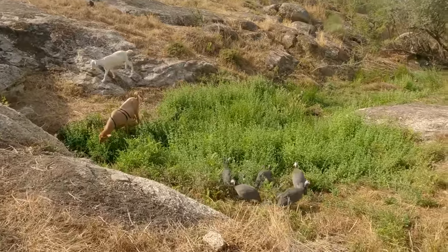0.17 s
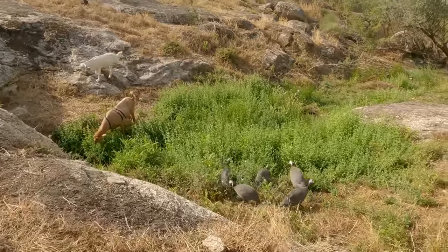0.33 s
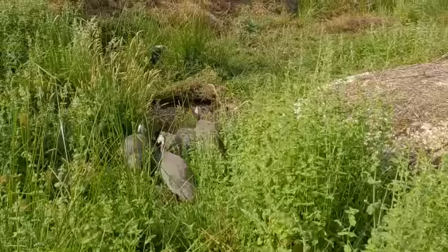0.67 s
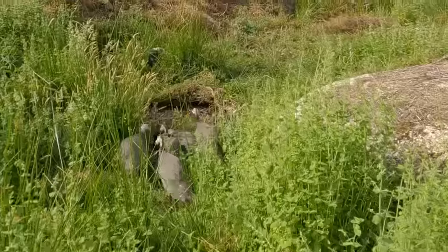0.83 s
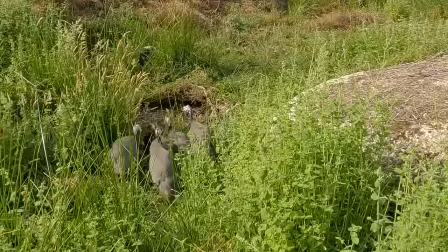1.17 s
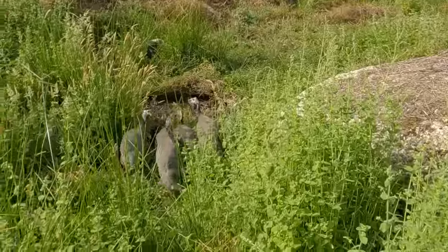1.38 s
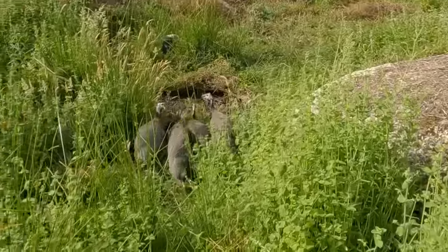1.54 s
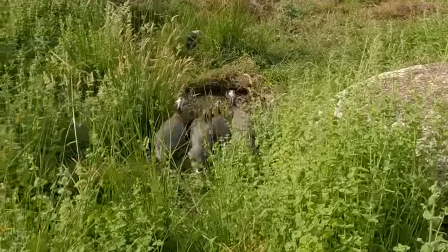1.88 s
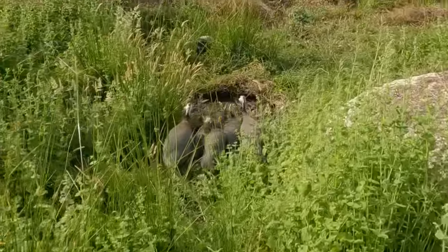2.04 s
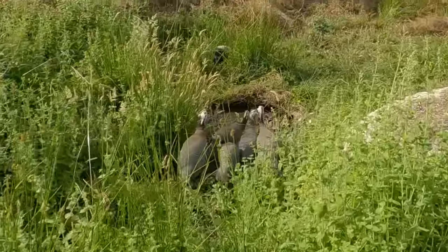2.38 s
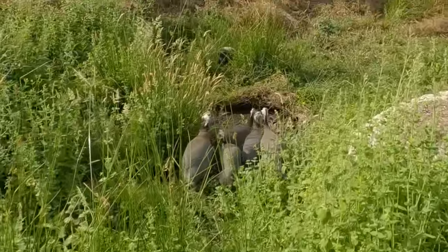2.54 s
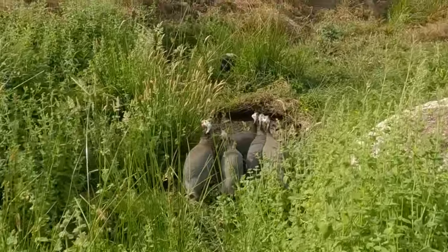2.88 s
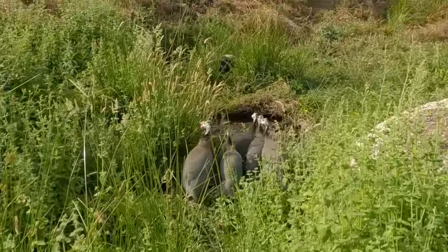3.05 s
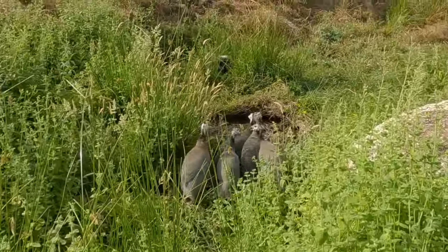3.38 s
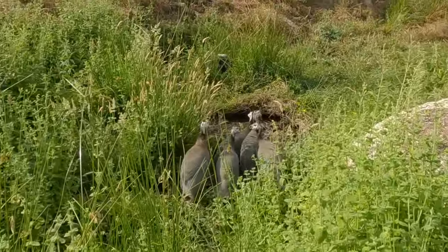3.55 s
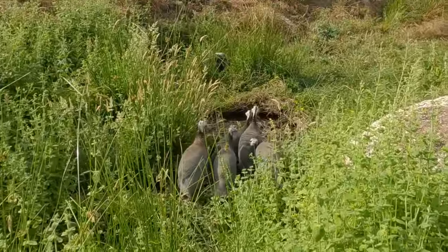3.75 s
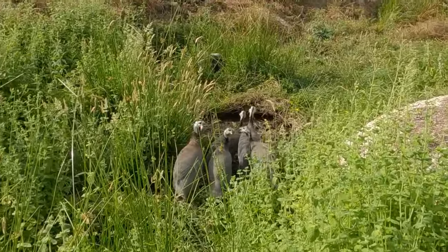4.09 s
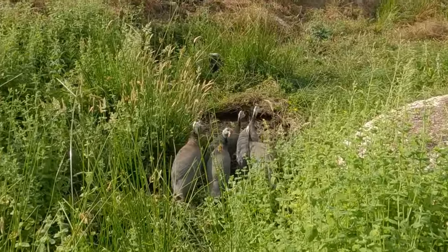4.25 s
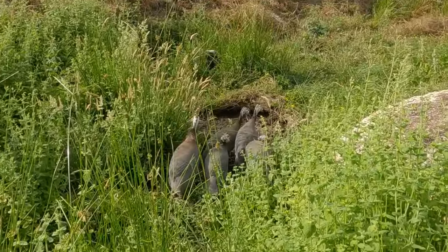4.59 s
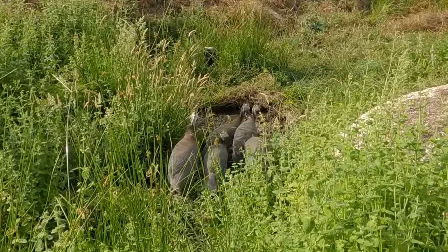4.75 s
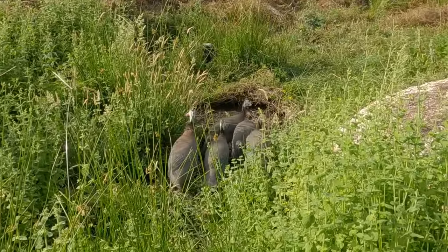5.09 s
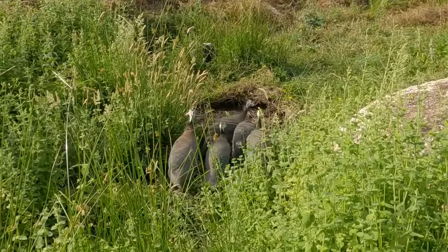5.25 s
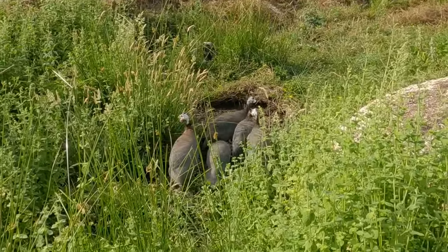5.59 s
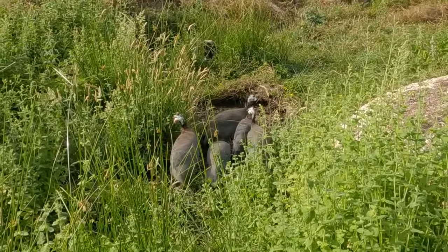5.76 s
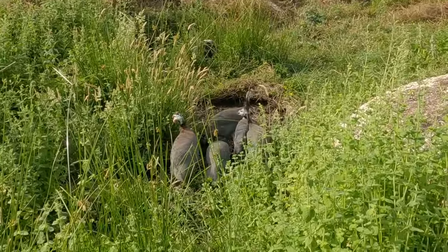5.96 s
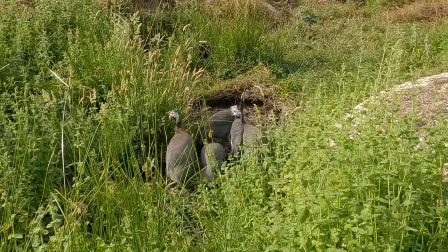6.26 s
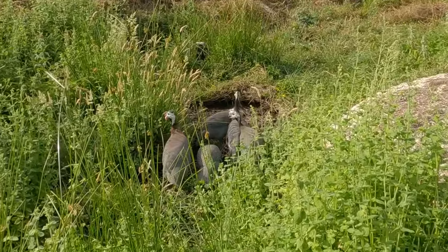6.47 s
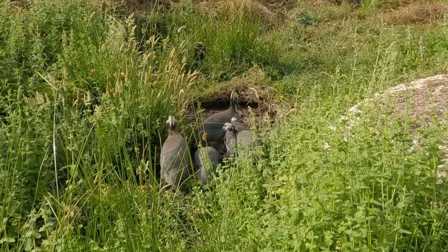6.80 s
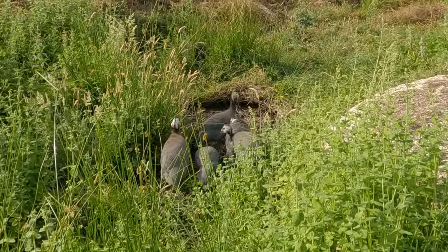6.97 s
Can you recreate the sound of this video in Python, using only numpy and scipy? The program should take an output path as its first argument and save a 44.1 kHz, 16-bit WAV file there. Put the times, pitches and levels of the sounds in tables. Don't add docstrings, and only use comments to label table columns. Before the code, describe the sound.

A loud peep opens over dry straw that hisses, ticks and snaps for about half a second. The scene then shifts to greener weeds, where several guinea fowl peep, cluck and rasp a few metres away. Leaf rustle gradually dies down, stems crack, and two long whistles hold, leap up and fall between short harsh cackles. Close, dry outdoor sound with thin bass and faint rock echoes.

```python
import sys
import numpy as np
from scipy import signal
from scipy.fft import rfft, irfft
from scipy.io import wavfile
from scipy.ndimage import uniform_filter1d

SR = 44100
rng = np.random.default_rng(int(sys.argv[2]) if len(sys.argv) > 2 else 0)


def linear_from_db(decibels):
    return 10 ** (np.asarray(decibels, float) / 20)


def unload_audio(sound):
    columns = np.transpose(np.atleast_2d(sound))
    steps = np.round(np.clip(columns, -1, 1) * 32767)
    wavfile.write(sys.argv[1], SR, steps.astype(np.int16))


N = 314433


def evened(x):
    return x / np.sqrt(np.mean(x ** 2) + 1e-20)


def read(points, hz):
    f, value = np.transpose(points)
    return np.interp(np.log(hz + 1), np.log(f + 1), value)


def add(mix, s, sound):
    start = round(s * SR)
    part = mix[max(start, 0):][:len(sound) + min(start, 0)]
    part += sound[max(-start, 0):][:len(part)]


def wander(count, hz):
    noise = rng.standard_normal(count + 800)
    return evened(signal.lfilter(*signal.butter(2, hz, fs=SR), noise)[800:])


def band(x, lo_hz, hi_hz):
    return signal.sosfilt(signal.butter(2, [lo_hz, hi_hz], "band", fs=SR, output="sos"), x)


# (t/s, rustle level/dB, gust level/dB)
STIRRING = [(0, 28.5, 10.5), (.142, 20.5, -4), (.43, 18.5, 2), (.535, 33, 8), (0.613, 28, 8), (.624, 20, 5),
            (.95, 14.5, 3), (1.601, 20.5, 7.5), (1.89, 11, -3), (3.18, 0.5, 0.5), (3.31, 12.5, 5),
            (3.45, -2, 1), (3.62, -2, 1), (4.0, -1, -2.5), (4.85, -5, -2.5), (5.99, 0.5, 3),
            (6.84, -4.5, -3), (7.13, -2, -5)]
STIRRING_HZ = [350, 1800, 5200, 11500]
# (f/Hz, level/dB per Hz)
LEAF_COLOUR = [(53, -76), (90, -42.5), (142, -9), (276, -9.5), (587, -5), (885, -8.5), (1070, -8.5),
               (1420, -5.5), (1840, -2), (3090, -12), (4090, -20.5), (7160, -33), (8880, -42), (10300, -42),
               (15600, -53)]
# (f/Hz, level/dB)
EARLY_COLOUR = [(5000, 0), (7500, -2.5), (8800, -2.5), (9700, 3), (10600, 0), (15000, 2.5)]
MID_SHARE, MID_DB, TOP_SHARE, TOP_DB = 0.42, -6.5, 0.68, -2
STRAW_S, STRAW_DB = .618, 10
BREATH_DB, BREATH_S = 37.5, 0.025


def leaves():
    hz, t, hiss = signal.stft(rng.standard_normal(N + 512), SR, nperseg=512, noverlap=384)
    size = linear_from_db(4.0 * np.minimum(rng.exponential(1, N + 512), 3))
    size = size * (rng.random(N + 512) < 900 / SR)
    pops = evened(size * rng.choice([-1, 1], N + 512))
    crackle = signal.stft(pops, SR, nperseg=512, noverlap=384)[2]
    s, rustle, gust = np.transpose(STIRRING)
    rustle, gust = np.interp(t, s, rustle), np.interp(t, s, gust)
    straw = t < STRAW_S
    breath = 0
    for rows in CACKLES[1:]:
        at, _, db = max(rows, key=lambda row: row[2])
        breath = breath + (db + BREATH_DB) * np.exp(-((t - at) / BREATH_S) ** 2)
    middle = MID_DB + MID_SHARE * rustle + breath
    top = TOP_DB + TOP_SHARE * rustle + STRAW_DB * straw
    change = np.array([gust, middle, rustle + .5 * breath, top])
    change = np.array([np.interp(np.log(hz + 1), np.log(STIRRING_HZ), column) for column in change.T]).T
    share = np.clip(0.52 + 0.0092 * change, 0, .9) * np.interp(hz, [500, 4000], [0, 1])[:, None]
    patches = uniform_filter1d(rng.standard_normal(hiss.shape), 8, 0)
    patches = evened(uniform_filter1d(patches, 16, 1))
    flicker = evened(uniform_filter1d(rng.standard_normal(len(t)), size=6))
    field_db = read(LEAF_COLOUR, hz)[:, None] + change + np.outer(read(EARLY_COLOUR, hz), straw)
    field_db = field_db + 1.5 * patches + 1.2 * flicker
    hiss = (np.sqrt(1 - share ** 2) * hiss + share * crackle) * linear_from_db(field_db)
    return linear_from_db(-33.5) * signal.istft(hiss, SR, nperseg=512, noverlap=384)[1][:N]


# (t/s, peak level/dB, f/Hz)
KNOCKS = [
    (0.547, -41.5, 350),
    (3.785, -48, 169),
    (4.432, -50.5, 167),
    (5.408, -55, 350),
    (6.128, -47.5, 184),
    (6.163, -52, 340),
]
# (t/s, level/dB, upper edge f/Hz, fade t/s)
BRUSHES = [
    (.69, -40.5, 935, 0.057),
    (0.884, -30.5, 1420, 0.058),
    (1.123, -33.5, 910, 0.03),
    (3.199, -36.5, 930, 0.018),
    (3.249, -75, 7250, 0.044),
    (6.014, -57, 3800, .04),
    (6.162, -55, 3800, .03),
]


def feet():
    out, t = np.zeros(N), np.arange(SR // 5) / SR
    for s, db, hz in KNOCKS:
        swell = t / 0.00089 * np.exp(1 - t / 0.0027)
        add(out, s, linear_from_db(db) * np.sin(2 * np.pi * hz * t) * swell)
    for s, db, hz, fade in BRUSHES:
        brush = evened(band(rng.standard_normal(len(t)), 277, hz))
        add(out, s, linear_from_db(db) * brush * (1 - np.exp(-t / 0.0099)) * np.exp(-t / fade))
    return out


# (t/s, peak level/dB, f/Hz, length/cycles)
TICKS = [(.0014, -15, 2600, 1.0), (.0402, -20, 3000, .8), (.1094, -23, 4000, .9), (.1131, -28, 3400, 1.1),
         (.1193, -23, 2700, 1.2), (.1549, -28, 2900, 1.6), (.1605, -30, 2800, 1.1), (.1708, -32, 3200, 1.1),
         (.2046, -14, 2600, .8), (.2136, -27, 2700, 1.2), (.2214, -33, 4500, 1.1), (.2315, -8.5, 4000, .9),
         (.241, -8, 4000, .45), (.2476, -31, 2400, 1.5), (.2597, -34, 3000, .8), (.2665, -31, 4500, 1.4),
         (.278, -32, 4800, 1.4), (.2825, -31, 3100, 2.2), (.446, -27, 2600, .9), (.53, -18, 2700, .6),
         (.5619, -20, 3000, .7), (.5792, -13.5, 3600, .6), (.6178, -27, 3200, .8), (6.0174, -27, 2200, .8),
         (6.063, -35, 3500, .9), (6.1655, -30, 3500, .8), (6.281, -39, 4700, 1.3)]


def ticks():
    out, t = np.zeros(N), np.arange(300) / SR
    for s, db, hz, cycles in TICKS:
        u = t * hz / max(cycles, .2)
        tick = np.sin(2 * np.pi * hz * t) * u * np.exp(-1.45 * u)
        tick[1] += .1 * abs(tick).max()
        tick = band(tick, 1500, 11500)
        add(out, s, linear_from_db(db) * tick / abs(tick).max())
    return out


# (t/s, peak level/dB, centre f/Hz,
# treble level/dB, scrape t/s)
SNAPS = [(0.045, -27, 2400, -6, 0.002), (0.188, -28, 2800, -6, 0.003), (0.3686, -31, 3100, -6, 0.0005),
         (0.1985, -32, 2800, -3, 0.0005), (0.233, -30, 3000, -7, 0.001), (0.336, -47, 2140, -6.5, 0.00024),
         (0.353, -32, 1810, -19, 0.00047), (0.4815, -27, 2500, -12, 0.00072),
         (0.5305, -22, 2870, -8, 0.002), (0.5795, -20, 2850, -3, 0.0012), (0.855, -31, 3500, 0, .0006),
         (1.154, -28.5, 2200, -12, .0006), (0.6716, -29, 1920, 1.5, 0.00036),
         (1.0955, -28, 2400, -12, 0.0006), (1.125, -27.5, 2300, -21, 0.0022),
         (1.2505, -24.5, 2510, -3, 0.000059), (2.008, -33, 2940, -2, 0.00011),
         (.543, -22.5, 3020, -28, 0.0028), (0.549, -36, 2800, -13, .002),
              (0.57, -27.5, 2610, -7, 0.0025), (2.594, -42.5, 2400, -10, 0.00085),
              (2.624, -35, 2800, -18, 0.002), (2.634, -31, 3400, -14, .002), (2.726, -32, 4100, -16, .003),
              (2.634, -33.5, 1470, -21, 0.0012), (2.661, -35, 3640, -30, 0.0037),
              (2.7245, -30, 1730, -9.5, 0.0044), (2.761, -30.5, 1810, -16, 0.0017),
              (2.7705, -27.5, 2120, -19, 0.0014), (2.9, -41, 2070, -21, 0.001),
              (2.9907, -26.5, 2040, -18, 0.0015), (3.2014, -24.5, 2100, -24, 0.0014),
              (3.6162, -42, 2350, -9, 0.0013), (5.005, -32, 2660, -24, 0.00051),
              (6.018, -38, 2200, -8, 0.003), (6.063, -39, 2000, -6, 0.0015),
              (6.1655, -34, 1900, -3, 0.0012), (6.574, -37, 2020, -34, 0.0025)]


def snaps():
    out, t, rows = np.zeros(N), np.arange(1600) / SR, SNAPS
    for s, db, hz, treble_db, scrape in rows:
        u = t / max(scrape, .0001)
        crack = rng.standard_normal(len(t)) * (u * np.exp(1 - u) + 0.025 * np.exp(-t / 0.01))
        crack[1] += 0.00059 / scrape
        body = band(band(crack, hz / 1.384, hz * 1.295), 350, 3200)
        treble = band(band(crack, 3000, 6600), 3000, 6600)
        treble += .06 * band(crack, 7000, 13000) * .0003 / scrape
        crack = body / abs(body).max() + linear_from_db(treble_db) * treble / abs(treble).max()
        add(out, s, linear_from_db(db) * crack)
    return out


# (f/Hz, level/dB)
THROAT = [(560, -36), (830, -8), (1300, 0), (2400, -1), (3500, -26), (4600, -24), (6200, -42), (9000, -65)]


def cluck(middle, length, pitch_hz, db, bright_db, beak, rough):
    count = int(length * SR)
    hz = pitch_hz * (1 + np.linspace(.05, -.05, count) + .07 * rough * wander(count, 250))
    turn = 2 * np.pi * np.cumsum(hz) / SR
    early = turn + .9 * rough * np.sin(turn / 4)
    folds = sum(np.cos(k * early + 0.16 * k ** 2) for k in range(1, int(9000 / pitch_hz) + 1))
    stumble = 1 + rough * (.6 * np.cos(turn / 4) + .5 * wander(count, 400))
    swell = np.sin(np.pi * np.linspace(0, 1, count) ** 1.3) ** 1.5
    f = np.fft.rfftfreq(count, 1 / SR)
    colour_db = read(THROAT, np.maximum(f / beak, np.minimum(f, 1300)))
    colour_db += bright_db * np.log2(np.maximum(f, .7 * pitch_hz) / 1000 + 0.16)
    colour_db -= 24 * np.log2(np.maximum(f / 4500, 1))
    voice = irfft(rfft(folds * stumble * swell) * linear_from_db(colour_db), count)
    return middle - length / 2, linear_from_db(db) * evened(voice) * signal.windows.tukey(count, .2)


# (middle t/s, length t/s, pitch f/Hz, level/dB, brightness/dB per octave)
CLUCKS = [(.015, 0.011, 985, -27, -1.5), (.644, 0.013, 2560, -30.5, -15), (.665, .014, 1310, -32, -7),
          (1.035, 0.014, 1293, -35.5, -7), (1.207, .013, 1339, -22, -0.5), (.016, .014, 1966, -30, -12),
          (1.761, 0.011, 1383, -32, -6), (2.104, .026, 533, -37.5, 2), (2.49, .024, 1560, -49.5, -8),
          (2.511, .017, 1396, -32, -8), (3.484, .022, 2343, -21.5, -16), (3.333, .018, 2680, -37, -15),
          (1.031, .01, 2000, -35, -15), (5.256, .022, 1345, -50, -16), (5.359, .009, 2713, -19.5, -30),
          (5.794, .018, 2420, -40.5, -12), (5.349, 0.02, 1570, -40, 7), (5.368, .016, 1387, -32.5, -7.5),
          (6.96, 0.012, 1310, -37.5, -19), (6.952, .007, 2640, -39, -26), (7.125, 0.035, 1325, -47.5, -7)]
# (middle t/s, length t/s, pitch f/Hz, level/dB, brightness/dB per octave)
RASPS = [(.738, 0.042, 2700, -37, -3), (.747, 0.011, 2570, -33.5, -3), (.753, 0.024, 2230, -37.5, 1),
         (1.004, .02, 2570, -40.5, -8), (1.495, .034, 808, -34, -12), (1.478, 0.027, 2350, -36, -5),
         (1.492, 0.013, 2380, -26.5, -2), (1.501, 0.0093, 2325, -25.5, -3), (1.51, 0.014, 2007, -26.5, -9),
         (3.461, 0.012, 698, -48.5, -5), (5.369, 0.016, 468, -37, 2), (5.541, .03, 2350, -40, -3.5),
         (6.858, .02, 2460, -50, -5)]
CLUCK_BEAK, RASP_BEAK, GAPE_HZ = 1.36, 1.09, 1906


def clucks_and_rasps(low):
    for rows, beak, rough in (CLUCKS, CLUCK_BEAK, .07), (RASPS, RASP_BEAK, .7):
        for row in rows:
            add(low, *cluck(*row, beak * max(1, row[2] / GAPE_HZ), rough))


def cackle(rows, partials, rough, grow):
    s, hz, db = np.transpose(rows)
    t = np.arange(s[0], s[-1], 1 / SR)
    hz = np.interp(t, s, hz)
    slack_db = uniform_filter1d(np.interp(t, s, db - db.max()), size=60)
    turn = 2 * np.pi * np.cumsum(hz * (1 + .02 * rough * wander(len(t), 200))) / SR
    knee_khz = np.where(t < s[db.argmax()], 1.2, 2.7)
    voice = 0
    for k, own_db in partials:
        level_db = own_db + slack_db * (1 + grow * np.maximum(k * hz[0] / 1000 - knee_khz, 0))
        shiver = 1 + 0.41 * rough * wander(len(t), 110)
        slip = rough * (.5 + 0.37 * k) * wander(len(t), 140)
        voice = voice + linear_from_db(level_db) * shiver * np.cos(k * turn + (.4 + 2 * np.pi) * k ** 2 + slip)
    return t[0], np.sqrt(2) * linear_from_db(db.max()) * voice * signal.windows.tukey(len(t), .1)


# (t/s, pitch f/Hz, effort level/dB)
CACKLES = [
    [(1.511, 927, -44), (1.517, 923, -21.5), (1.529, 872, -18.5), (1.544, 860, -23.5), (1.549, 855, -48)],
    [(3.482, 671, -40), (3.488, 654.6, -19), (3.495, 644, -20.5), (3.505, 647, -27), (3.516, 630, -45)],
    [(3.94, 1269, -53), (3.951, 1220, -25.5), (3.964, 1138, -18), (3.969, 1120, -20.5), (3.974, 1070, -39),
     (3.979, 1080, -51)],
    [(5.545, 1260, -43), (5.553, 1305, -41), (5.556, 1250, -30), (5.568, 1180, -50)],
    [(6.855, 1290, -45), (6.864, 1241, -28.5), (6.868, 1200, -22), (6.875, 1154, -20.5),
     (6.88, 1130, -29.5), (6.885, 1110, -43)],
]
# (multiple of the pitch, level/dB)
PARTIALS = [
    [(1, -4.5), (2, -1), (3, 0), (4, -5), (5, -23)],
    [(1.5, -22), (2, -4), (2.25, -1), (2.5, -5), (2.75, -13), (3, 1.5), (3.25, -14), (3.5, -4), (3.75, -12),
     (4.25, -17.5), (4.5, -23), (5.25, -30), (6, -30), (6.5, -27), (7, -23), (7.5, -24), (8, -27),
     (8.75, -31), (11, -50), (12.5, -49)],
    [(.75, -25), (1, -4), (1.25, -14), (1.75, -11), (2, 3), (2.25, -15), (2.75, -21), (3, -17), (3.25, -23),
     (3.75, -22), (2.5, -27), (3.5, -28), (4, -26), (4.25, -28), (4.5, -29), (4.75, -30), (5, -29)],
    [(.65, -12), (1, -1.5), (1.22, -8), (1.5, -15), (1.82, 4), (2.19, -3.5), (2.95, -14.5)],
    [(.75, -33), (1, 0), (1.25, -15), (1.75, -15), (2, 2), (2.25, -16), (2.75, -22), (3, -13.5),
     (3.25, -22), (3.75, -28), (4, -26), (4.25, -31), (4.75, -34), (5, -33), (5.5, -38), (6, -42), (7, -47)],
]
CACKLE_ROUGH = [.1, .4, .22, .6, .2]
CACKLE_GROW = [0.13, .1, 0.64, 0.35, 0.86]


def cackles(low):
    for parts in zip(CACKLES, PARTIALS, CACKLE_ROUGH, CACKLE_GROW):
        add(low, *cackle(*parts))


def whistle(rows, octave_db=-36, trill_hz=0., trill_depth=0., flutter_db=1.3, climb_db=15.0,
            trill_bend=.03, ragged=0., half_db=-90.):
    s, hz, db = np.transpose(rows)
    t = np.arange(s[0] - .002, s[-1] + .002, 1 / SR)
    shake = np.sin(2 * np.pi * trill_hz * (t - .8035))
    ends = 1 + ragged * np.linspace(-1, 1, len(t)) ** 2
    bend = np.minimum(trill_bend * ends, .1) * shake * (trill_hz > 0)
    hz = uniform_filter1d(np.interp(t, s, hz), size=180) * (1 + bend)
    hz = hz * (1 + 0.0089 * wander(len(t), 110))
    db = uniform_filter1d(np.interp(t, s, db), size=60) + flutter_db * wander(len(t), 70)
    octave = linear_from_db(db + octave_db + climb_db * (hz - 2100) / 1000 + 0.2 * (db + 29.0))
    turn = 2 * np.pi * np.cumsum(hz) / SR
    tone = linear_from_db(db) * np.sin(turn) + octave * np.sin(2 * turn) + linear_from_db(db + half_db) * np.sin(1.5 * turn)
    tone *= 1 - np.minimum(trill_depth * ends, .92) * ((1 - shake) / 2) ** 2.5
    return t[0], np.sqrt(2) * tone * signal.windows.tukey(len(t), min(1, 300 / len(t)))


# (t/s, pitch f/Hz, level/dB)
DRONES = [
    [(2.87, 1232, -53), (2.912, 1170, -37.5), (2.968, 1170, -64), (3.01, 1195, -48), (3.075, 1198, -33.5),
     (3.14, 1185, -46.5), (3.195, 1194, -30.5), (3.22, 1277, -34.5), (3.235, 1290, -81)],
    [(4.49, 1224, -55), (4.524, 1166, -28.5), (4.565, 1104, -70), (4.66, 1173, -66), (4.727, 1150, -34.5),
     (4.802, 1120, -60), (4.855, 1224, -43.5), (4.868, 1345, -64)],
    [(3.482, 980, -48), (3.494, 958, -32), (3.512, 960, -43), (3.555, 950, -54)],
]
DRONE_OCTAVE_DB = [-9, 7.5, 20.5]


def drones(low):
    for rows, octave_db in zip(DRONES, DRONE_OCTAVE_DB):
        add(low, *whistle(rows, octave_db))


# (t/s, pitch f/Hz, level/dB)
LEAD_INS = [
    [(3.916, 2200, -53.5), (3.953, 2380, -40)],
    [(6.83, 2255, -52), (6.866, 2540, -40)],
    [(5.529, 2500, -46), (5.553, 2440, -41)],
]


def lead_ins(high):
    for rows in LEAD_INS:
        add(high, *whistle(rows, octave_db=-54, trill_hz=95., trill_depth=0.7, flutter_db=4.0, trill_bend=0.07))


# (f/Hz, level/dB)
PIPE = [(1500, -26), (1900, -6.5), (2300, -1.5), (2650, 0), (2950, -10.5), (3200, -18), (3450, -10),
        (3900, -6)]
EDGE_DB = -8.5
PUSH_AT, PUSH_WIDTH, SWELL_SHARE = 0.62, 0.33, 0.25
SPENT_SHARE = 0.62


def arch(crest_s, rise_s, crest_hz, db, push_db, sag, fall):
    u = np.linspace(-1, 1, num=41)
    hz = crest_hz * (1 - sag * u ** 2)
    spent = SPENT_SHARE if push_db < 0 else 1
    s = crest_s + rise_s * np.where(u > 0, fall * spent, 1) * u
    push = abs(push_db) * np.exp(-((u * np.sign(push_db) - PUSH_AT) / PUSH_WIDTH) ** 2)
    push = push + SWELL_SHARE * push_db * u
    edge = EDGE_DB * u ** np.where(u > 0, 8, 4)
    return np.transpose([s, hz, db + read(PIPE, hz) + push + edge])


# (t/s, pitch f/Hz, level/dB)
HOLDS = [
    [(2.845, 1784, -53), (2.859, 2050, -42), (2.873, 2250, -40), (2.925, 2000, -40.5), (2.99, 2050, -40),
     (3.035, 2220, -39), (3.096, 2186, -39), (3.122, 2063, -40.5), (3.208, 2175, -39)],
    [(4.475, 1850, -50), (4.5, 2115, -42), (4.515, 2090, -38), (4.53, 2030, -50), (4.572, 1795, -51),
     (4.612, 1950, -46.5), (4.71, 2030, -45), (4.79, 1935, -48.5), (4.839, 2134, -36)],
]
# (crest t/s, rise t/s, crest f/Hz, level/dB, push level/dB)
LEAPS = [
    (3.283, 0.066, 3840, -43, 11),
    (4.912, 0.071, 3665, -41.5, 4),
]
# (t/s from the crest, pitch over crest pitch, level/dB)
SIDE_TONE = [
    (-.045, 0.92, -80),
    (-.027, 1.2, -70.5),
    (.006, 1.07, -55),
    (.018, 0.37, -72),
]
LEAP_SAG, LEAP_FALL = 0.52, 1.03
FLUTTER_DB = 2.1


def long_whistles(high):
    for hold, leap in zip(HOLDS, LEAPS):
        rows = np.vstack([hold, arch(*leap, LEAP_SAG, LEAP_FALL)[4:]])
        add(high, *whistle(rows, flutter_db=FLUTTER_DB))
        side = np.array(SIDE_TONE) * [1, leap[2], 1] + [leap[0], 0, 0]
        add(high, *whistle(side, octave_db=-46))


# (crest t/s, rise t/s, crest f/Hz, level/dB, push level/dB as pitch drops; climbs if negative)
PEEPS = [
    (.002, 0.014, 3070, -20.5, 1.5),
    (5.347, 0.031, 3210, -31.5, 9.5),
    (5.772, 0.038, 3250, -38.5, 8.5),
    (5.856, 0.046, 2470, -36, 5.5),
    (6.942, .024, 3260, -43, 5.5),
    (7.115, .024, 2410, -44, -2),
]
# (t/s, pitch f/Hz, level/dB)
TRILL = [
    (.765, 2150, -46),
    (.787, 2280, -33),
    (.797, 2540, -24),
    (.808, 2630, -20),
    (.828, 2640, -19.5),
    (.841, 2620, -18.5),
    (.846, 2500, -26),
    (.858, 2300, -29),
    (.872, 2100, -36),
]
# (t/s, pitch f/Hz, level/dB)
NEAR_PEEPS = [
    [(.623, 2515, -42), (.632, 2875, -35), (.642, 3140, -28), (.65, 2910, -31), (.656, 2660, -24),
     (.664, 1900, -32)],
    [(1.01, 3150, -43), (1.017, 2910, -39), (1.022, 2580, -37), (1.027, 2416, -19), (1.034, 2370, -31.5),
     (1.043, 2400, -40)],
    [(1.167, 2200, -34.5), (1.177, 2780, -36), (1.186, 2990, -32), (1.196, 2990, -28), (1.202, 2340, -21.5),
     (1.206, 2190, -28)],
    [(1.716, 2000, -44), (1.732, 2960, -35), (1.742, 3010, -37), (1.75, 2810, -22.5), (1.754, 2470, -37),
     (1.757, 2160, -15), (1.762, 2110, -29)],
    [(2.07, 2010, -47), (2.085, 2266, -19.5), (2.093, 2390, -23), (2.097, 2640, -28), (2.108, 2820, -29),
     (2.114, 2870, -38), (2.13, 2870, -42), (2.138, 2060, -29.5)],
    [(2.458, 2200, -50), (2.469, 2620, -33), (2.479, 2810, -28.5), (2.49, 3100, -43), (2.499, 2814, -20.5),
     (2.503, 2480, -35), (2.505, 2180, -21), (2.509, 2150, -39)],
    [(6.723, 1410, -47), (6.741, 1970, -31.5), (6.752, 2173, -31), (6.764, 2250, -33.5),
     (6.773, 2100, -35.5), (6.78, 1750, -46)],
]
PEEP_SAG, FALL_SHARE = 0.43, 0.615


def peeps(high):
    for row in PEEPS:
        rows = arch(*row, PEEP_SAG, FALL_SHARE)
        add(high, *whistle(rows, octave_db=-39, climb_db=5., flutter_db=1.5))
    add(high, *whistle(TRILL, octave_db=-62, trill_hz=116.0, trill_depth=0.35, trill_bend=.028,
                       ragged=9., flutter_db=.5))
    add(high, *whistle(NEAR_PEEPS[-1], octave_db=-32, climb_db=50., flutter_db=1.2))
    for rows in NEAR_PEEPS[:-1]:
        add(high, *whistle(rows, octave_db=-29, climb_db=-4., flutter_db=1.6, half_db=-32.))


# (delay t/s, level/dB)
ECHOES = [
    (0.02, -22.5),
    (0.032, -30),
]


def flock():
    high, low = np.zeros(N), np.zeros(N)
    clucks_and_rasps(low)
    cackles(low)
    drones(low)
    lead_ins(high)
    long_whistles(high)
    peeps(high)
    calls = high + low + linear_from_db(13.5) * band(high * low, 3900, 4600)
    t = np.arange(SR // 4) / SR
    scatter = rng.standard_normal(len(t)) * linear_from_db(-60 * t / 0.35) * (t > .004)
    space = linear_from_db(-25) * scatter / np.linalg.norm(scatter)
    space[0] = 1
    heard = signal.fftconvolve(calls, space)[:N]
    thin = band(calls, 1900, 4200)
    for s, db in ECHOES:
        add(heard, s, linear_from_db(db) * thin)
    return heard


def scene():
    return (leaves() + feet() + ticks() + snaps() + flock())[None]


def low_pass(x):
    return signal.sosfilt(signal.butter(12, 15710, fs=SR, output="sos"), x)


def record(dry):
    x = signal.sosfilt(signal.ellip(6, 1, 26, 138, "high", fs=SR, output="sos"), dry)
    x = signal.lfilter(*signal.iirnotch(9000, 16., SR), x)
    x = signal.sosfilt(signal.butter(6, 13200, fs=SR, output="sos"), x)
    return low_pass(x)


dry = scene()
out = record(dry)
unload_audio(out)
```